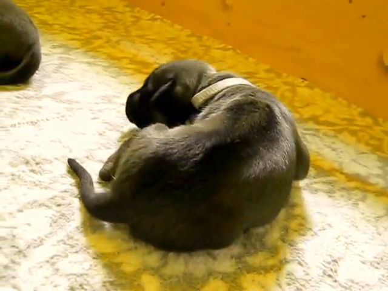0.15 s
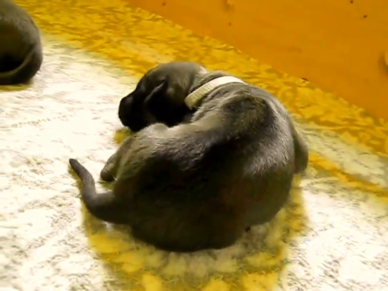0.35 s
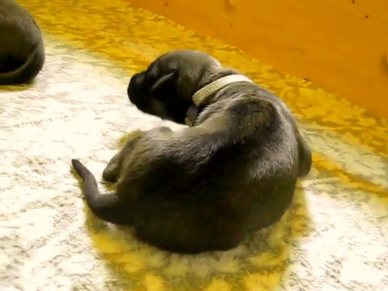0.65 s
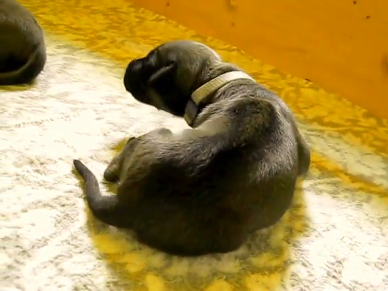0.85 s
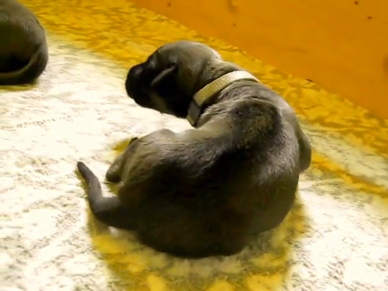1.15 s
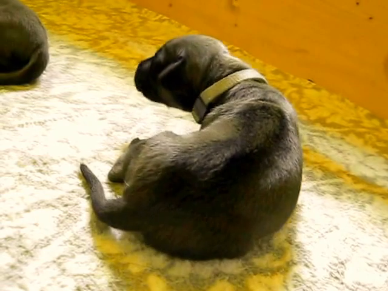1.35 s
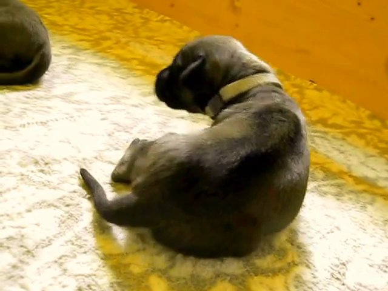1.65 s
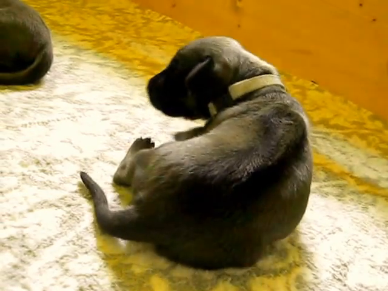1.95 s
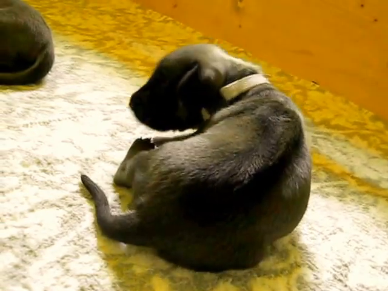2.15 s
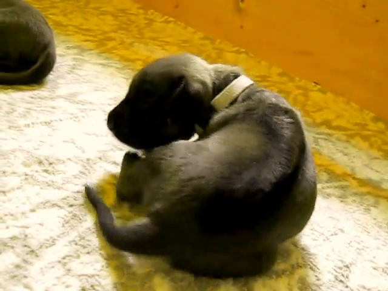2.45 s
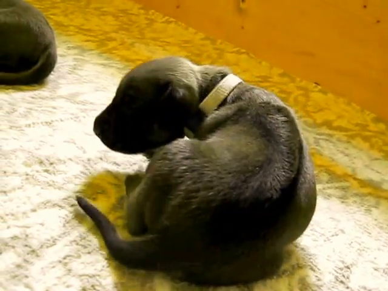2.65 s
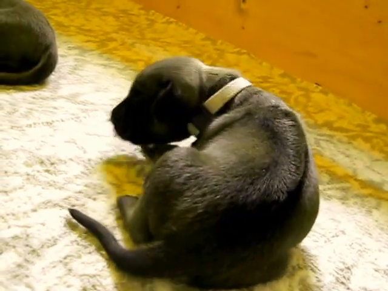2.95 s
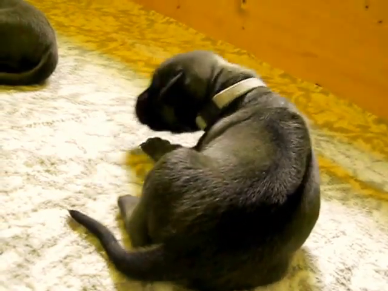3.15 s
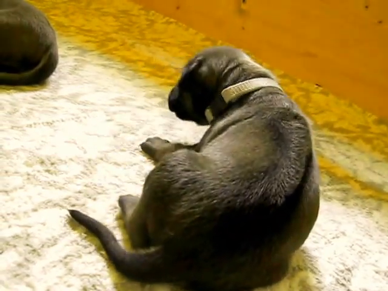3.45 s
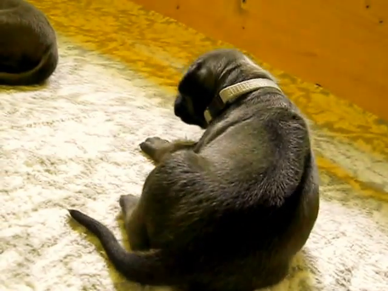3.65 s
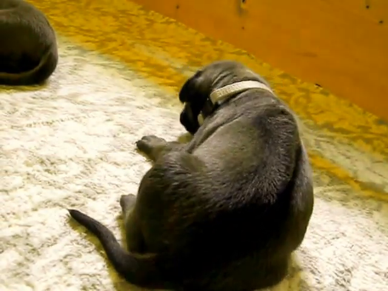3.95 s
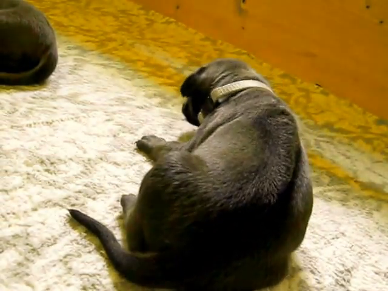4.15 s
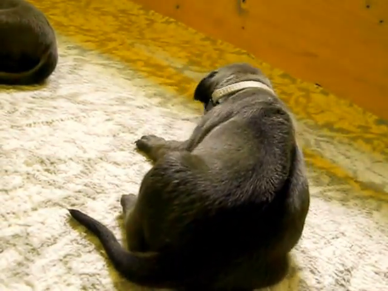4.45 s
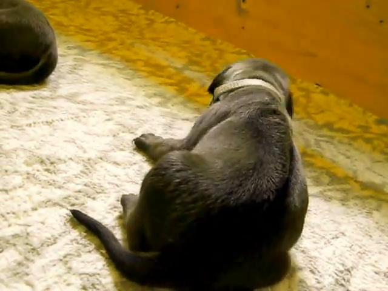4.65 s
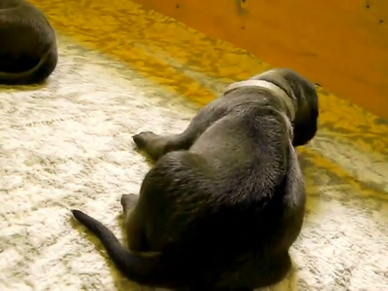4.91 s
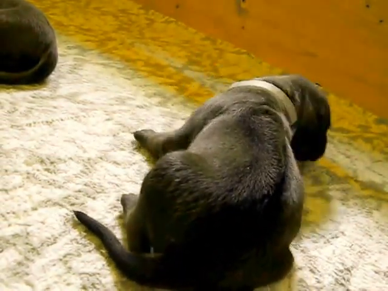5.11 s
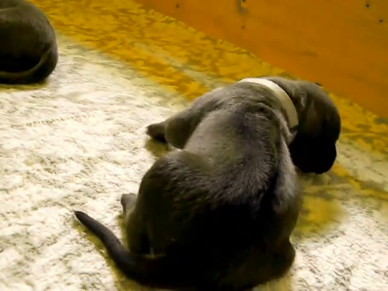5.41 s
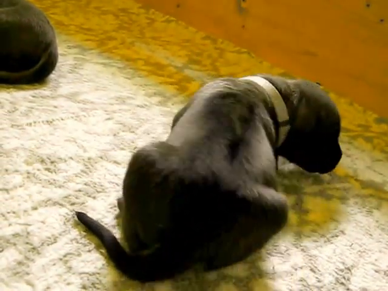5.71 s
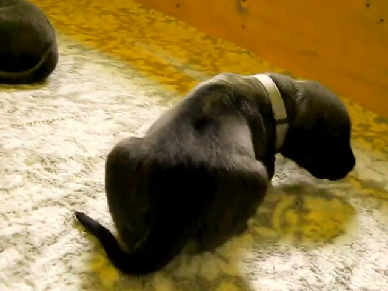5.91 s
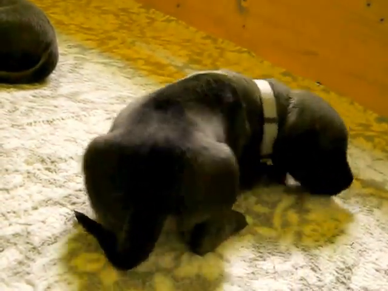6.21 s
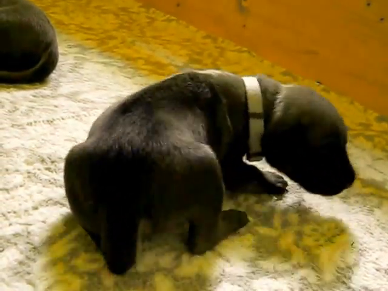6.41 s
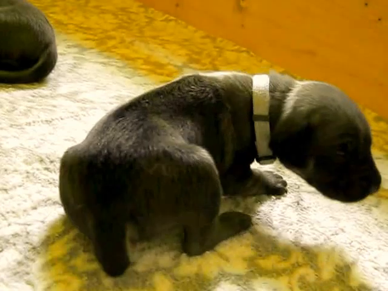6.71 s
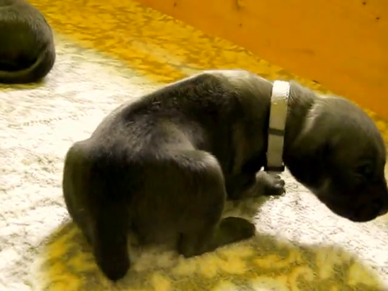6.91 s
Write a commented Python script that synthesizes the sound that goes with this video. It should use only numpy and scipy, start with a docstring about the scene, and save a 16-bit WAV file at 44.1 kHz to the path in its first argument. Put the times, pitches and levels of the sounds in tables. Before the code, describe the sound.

Brief puppy whines and piercing little squeaks come in separate bursts, with faint clicks and paw scuffs in a small boxy indoor space.

```python
"""A young puppy whimpers on a blanket in a wooden whelping box, close to the microphone. Low nasal whines and
high whistling squeaks are summed from vocal-fold partials through throat and nose; each cry bends in pitch and
creaks, in bursts of uneven fold slaps, as it starts and stops. Faint hums are wavering sines, mouth clicks and
paw scuffs are shaped noise; the room answers over a soft hiss."""
import sys
import numpy as np
from scipy import signal
from scipy.fft import rfft, irfft, next_fast_len
from scipy.io import wavfile
from scipy.ndimage import uniform_filter1d, map_coordinates

SR = 44100
rng = np.random.default_rng(int(sys.argv[2]) if len(sys.argv) > 2 else 0)


def generate_wav(signal):
    """Clip the signal to [-1, 1] and save it as 16-bit WAV at the path in sys.argv[1]."""
    frames = np.transpose(np.atleast_2d(signal))
    scaled = np.clip(frames, -1, 1) * 32767
    pcm = np.round(scaled).astype(np.int16)
    wavfile.write(sys.argv[1], SR, pcm)


N = 311787
T = np.arange(N) / SR

# Hiss spectrum. Each row: frequency in Hz, relative density in dB per Hz.
HISS_SPECTRUM = [(12, -49), (20, -11), (276, -3.5), (345, -4.5), (419, -5.5), (524, -6), (775, -6),
                 (1110, -7), (1470, -8.5), (1890, -9.5), (6470, -17), (7860, -20), (9560, -17.5),
                 (15800, -25)]
# Room decay. Each row: frequency in Hz, t60 in seconds.
ROOM_T60 = [(300, 0.33), (1000, 0.4), (2000, 0.18), (6000, 0.39), (14000, 0.42)]
# Blanket friction spectrum. Each row: frequency in Hz, relative level in dB.
BLANKET_SPECTRUM = [(200, -4), (600, 19), (1500, 14), (3000, 9), (4000, 10.5), (6000, -3), (15000, -13)]
# Paws scuff the blanket. Each row: centre in seconds, length in seconds, level in dB.
SCUFFS = [(0.11, 0.018, -56), (2.483, 0.044, -50), (3.129, 0.047, -52), (3.185, 0.052, -54),
          (3.25, 0.061, -56), (5.973, 0.032, -55), (6.549, 0.053, -57)]
# Mouth clicks and claw ticks. Each row: start in seconds, level in dB, then the dull and the bright part
# relative to it in dB, before the common CLICK_PARTS_DB.
CLICKS = [(0.107, -34, -8, -14), (3.035, -15.5, -16, -24), (3.0471, -37, -30.5, -9),
          (3.6184, -29, -13.5, -15), (5.0442, -36.5, -3.5, -26), (5.394, -27, -42, -13),
          (5.425, -38, -18, -9), (5.436, -39.5, -2, -22), (5.4977, -40, -22, -5),
          (5.536, -19.5, -17.5, -18.5), (5.6195, -37.5, -5, -18), (6.5331, -40.5, -5, -2),
          (6.559, -32, -29, -10)]
# Spectra of the two click parts. Each row: frequency in Hz, relative level in dB.
DULL_CLICK = [(200, 4), (900, 13.5), (2400, 2), (3600, 7.5), (8000, -34)]
BRIGHT_CLICK = [(3000, -20), (7000, -8.5), (15000, -13.5), (18000, -32)]
# Closed-mouth hums. Each row: start in seconds, length in seconds, pitch in Hz, fundamental level in dB,
# level step per overtone in dB.
HUMS = [(.39, .15, 345, -56, -16), (1.02, .075, 305, -57, -0.5), (.112, .03, 335, -48, -14)]
# Throat response. Each row: frequency in Hz, gain in dB.
THROAT = [(330, -7.5), (450, -12), (600, -6.5), (750, -4.5), (900, 1), (1120, 0), (1280, 0), (1420, -7),
          (1700, -5), (1900, -10), (2300, -22), (3000, -37), (4500, -47.5), (6000, -77)]
# Nasal ring. Each row: frequency in Hz, relative level in a whine in dB, in a whistle in dB.
NOSE = [(3040,-11,-42),(4760,-17,-24),(5380,7,3),(5730,9,-3.5),(6630,2.5,-10),(7500,-14.5,-26.5),(9340,-1,-8.5),(10300,3.5,2.5),(10870,-5,-16),(11400,5.5,-19),(13200,-9,-19),(14000,-9,-22),(15500,-0.5,-27)]
WHINE_NOSE, WHISTLE_NOSE = np.array(NOSE)[:, :2], np.array(NOSE)[:, ::2]
# The folds beat unevenly for a while. Each row: time in seconds, depth of period doubling 0-1.
DOUBLING = [(2.845, 0), (2.865, .45), (2.92, .3), (2.96, 0)]
# High squeaks. Each row: start, voice break, crest and end in seconds; start (before the leap lowers it),
# crest and end pitch in Hz; pitch leap at the break 0-1; level, level at the end re break, overtones,
# nasal ring and top of the ring in dB; roughness 0-1; opening and closing creak in dB.
SQUEAKS = [ (1.524, 1.553, 1.592, 1.655, 875, 1286, 1095, 0.06, -20.5, 0, -7.5, -51.5, -3, 0, -38, -45),
           (1.932, 1.957, 2.006, 2.085, 805.5, 1070, 755, 0.13, -25, 0.5, -5, -48, -5.5, 0.19, -31.5, -35),
           (5.486, 5.513, 5.536, 5.586, 959, 1117, 1169, 0.03, -25, -6, -2, -56, 3, 0.02, -36, -37.5),
           (5.846, 5.877, 5.907, 5.996, 984, 1275, 950, .05, -23, -5, -1, -48.5, 4, 0, -35, -35), ]
# Low whines. Each row: start, crest and end in seconds; start, crest and end pitch in Hz; sag on the way
# to the crest 0-1; level, start re crest, end re crest, fundamental, nasal ring and top of the ring in dB;
# roughness 0-1; opening and closing creak in dB.
WHINES = [ (1.099, 1.173, 1.192, 359.3, 463, 391, 0.1, -33, -11, -36, 1, -52.5, -5, 0.21, -54, -35),
          (2.331, 2.444, 2.466, 459.6, 666, 565, .03, -23, -9, -4.5, 0.5, -43, -7.5, 0.06, -44, -29.5),
          (2.753, 2.833, 2.982, 538.5, 564.3, 524.4, 0.2, -29, -5.5, 2, -1.5, -52.5, -4.5, 0.18, -40.5, -39),
          (3.28, 3.368, 3.393, 446, 460.4, 439, 0.13, -28, -14.5, -4.5, -1, -54.5, -2, 0.08, -40.5, -44),
          (3.684, 3.75, 3.759, 425.6, 367.4, 387, 0.08, -32.5, -11, -4, -2.5, -62, 6, 0.2, -43, -51),
          (4.118, 4.172, 4.183, 425.7, 379.3, 347, 0.07, -36.5, -8.5, -7, -2, -77, 1, 0.38, -43.5, -49),
          (4.661, 4.723, 4.730, 457, 469, 468, 0.05, -28, -3, -14, -5, -50.5, 1.5, 0.1, -47, -40),
          (5.088, 5.154, 5.159, 476.5, 575, 586, .05, -35.5, -6.5, -3.5, -2, -58, 5, 0.29, -38.5, -55),
          (6.213, 6.304, 6.438, 566.3, 587.6, 471.5, .105, -23.5, -16, -7.5, 1, -45, -1, 0.06, -35.5, -38.5),
          (6.682, 6.768, 6.788, 499.4, 399.7, 364, 0.2, -33.5, -5.5, -6, 7, -50, 0, 0.31, -34, -30.5),
          (7.05, 7.062, 7.090, 575, 550, 540, 0.04, -43.5, -16, 8, 15.5, -59, 14, 0.54, -39, -55), ]

HISS_DB = -55.8
CLICK_PARTS_DB = -5
TOP_HZ = 15800  # band limit
PARTIALS = np.arange(1, 41)[:, None]
SAG_AT, FALL_CURVE = 0.44, 0.82  # share of the rise where pitch sags most; shape of the fall, 1 = straight
PITCH_LAG_S = 0.02  # the folds cannot change pitch faster
SETTLE, LOOSE_ROUGH = 0.16, 0.5  # share of a cry before the folds find their beat; roughness until then
BREAK_S, BREAK_DB = 0.014, -16  # the fundamental falters at the flip
# before the flip: fundamental, overtones; and level at the start
PRESSED_DB, PRESSED_OVERTONES_DB, SQUEAK_SWELL_DB = -2.5, 2.5, -9
SWELL_CURVE = 1.69  # a whine swells fast at first, then eases into its crest
NOSE_FOLLOWS = 0.69  # share of the swell and fade that the nasal ring takes
CLOSING_S, CLOSING_DB = 0.0093, 13.5  # the closing mouth favours the fundamental
MUFFLE_ABOVE_HZ, MUFFLE_DB_PER_OCTAVE = 540, -40  # and, once shut, muffles the overtones
UPPER_DB, UPPER_ROUGH_DB = -14, 26  # past the third partial: clean whine; gain at full roughness
OPEN_CREAK_S, OPEN_CREAK_RATIO = 0.014, 1.366  # length; mouth resonance over the starting pitch
# shortest length; mouth resonance over the final pitch; ceiling of that resonance
CLOSE_CREAK_S, CLOSE_CREAK_RATIO, CLOSE_CREAK_MAX_HZ = 0.006, 1.677, 980
HOARSE_CREAK_S, CREAK_OVERHANG_S = 0.053, 0.004214  # extra length at full roughness; time past the voice


def amp(db):
    """Decibels to gain."""
    return 10 ** (np.asarray(db) / 20)


def unit(x):
    """Scale to rms 1."""
    return x / np.sqrt(np.mean(np.abs(x) ** 2) + 1e-20)


def along(points, hz):
    """(Hz, value) points read on a log axis."""
    f, v = np.transpose(points)
    return np.interp(np.log(hz + 1), np.log(f + 1), v)


def octaves_above(hz, corner_hz):
    """Octaves of hz over a corner; 0 below it."""
    return np.maximum(np.log2(hz / corner_hz), 0)


def wobble(t, rate_hz):
    """A smooth random curve, rate_hz knots a second."""
    knots = (t - t[0]) * rate_hz
    return map_coordinates(rng.standard_normal(4096), [knots + 2], mode="wrap")


def gate(t, start, end, edge):
    """1 between start and end, with soft edges."""
    return (1 + np.tanh((t - start) / edge)) * (1 + np.tanh((end - t) / edge)) / 4


def filtered(x, response):
    """x times a response of frequency."""
    m = next_fast_len(N + SR // 2)
    return irfft(rfft(x, m) * response(np.fft.rfftfreq(m, 1 / SR)), m)[:N]


def noise(spectrum):
    """Coloured noise of rms 1."""
    return unit(filtered(rng.standard_normal(N), lambda hz: amp(along(spectrum, hz))))


def hiss():
    """Steady coloured noise."""
    return amp(HISS_DB) * noise(HISS_SPECTRUM)


def room(x, early_db=-14, tail_db=-11.0, early_t60_s=0.33):
    """The room answers 5 ms later as decaying noise: an even early layer and a tail whose decay varies with
    frequency."""
    hz, t, z = signal.stft(rng.standard_normal((2, SR // 2)), SR, nperseg=256)
    early = signal.istft(z[0] * amp(-60 * t / early_t60_s), SR, nperseg=256)[1]
    tail = signal.istft(z[1] * amp(-60 * t / along(ROOM_T60, hz)[:, None]), SR, nperseg=256)[1]
    answer = amp(early_db) * early / np.linalg.norm(early)
    answer += amp(tail_db) * tail / np.linalg.norm(tail)
    return signal.fftconvolve(x, np.pad(answer, (SR // 200, 0)))[:N]


def scuffs(grain_db=3):
    """Paws drag over the pile in short strokes of grainy noise."""
    strokes = np.zeros(N)
    for centre, length, db in SCUFFS:
        strokes += amp(db) * gate(T, centre - length / 2, centre + length / 2, edge=0.0013)
    return strokes * unit(noise(BLANKET_SPECTRUM) * amp(grain_db * wobble(T, 210)))


def clicks(t60_s=0.037):
    """Each tick is a short decaying noise burst with a dull and a bright part."""
    dull, bright = np.zeros(N), np.zeros(N)
    fade = amp(-60 * T[:SR // 10] / t60_s)
    for start, db, dull_db, bright_db in CLICKS:
        first = round(start * SR)
        dull[first:][:len(fade)] += amp(db + dull_db + CLICK_PARTS_DB) * fade
        bright[first:][:len(fade)] += amp(db + bright_db + CLICK_PARTS_DB) * fade
    return dull * noise(DULL_CLICK) + bright * noise(BRIGHT_CLICK)


def hums():
    """Weak closed-mouth moans: four sine partials that waver together in pitch."""
    out = np.zeros(N)
    for start, length, hz, db, step_db in HUMS:
        span = np.abs(T - start - length / 2) < length
        t = T[span]
        phase = 2 * np.pi * np.cumsum(hz * (1 + 0.03 * wobble(t, 250))) / SR
        tone = sum(amp(db + step_db * k) * np.sin((k + 1) * phase) for k in range(4))
        out[span] += gate(t, start, start + length, edge=0.0012) * tone
    return out


def creak_times():
    """Creaks as the folds open and, longer if hoarse, close: centre s, length s, level dB, resonance Hz."""
    cries = [(start, *rest) for start, _, *rest in WHINES]
    cries += [(start, *rest) for start, _, _, *rest in SQUEAKS]
    for start, end, hz, _, end_hz, *_, hoarse, open_db, close_db in cries:
        yield start, OPEN_CREAK_S, open_db, OPEN_CREAK_RATIO * hz
        length = CLOSE_CREAK_S + HOARSE_CREAK_S * abs(hoarse)
        if end < T[-1]:
            close_hz = min(CLOSE_CREAK_RATIO * end_hz, CLOSE_CREAK_MAX_HZ)
            yield end + CREAK_OVERHANG_S - length / 2, length, close_db, close_hz


def creaks(rate_hz=430, upper_db=-6, upper_ratio=1.567, t60_s=0.029, nose_db=-19):
    """A few uneven slaps of the folds ring two mouth resonances and hiss in the nose."""
    out, ring_t = np.zeros(N), T[:SR // 40]
    nasal = noise(WHINE_NOSE)
    for centre, length, db, hz in creak_times():
        span = np.abs(T - centre) < length
        t = T[span]
        cycles = np.cumsum(rate_hz * amp(3 * wobble(t, 500))) / SR
        slaps = np.diff(np.floor(cycles), prepend=-1)  # an impulse at each whole cycle
        lower = np.sin(2 * np.pi * hz * ring_t)
        upper = amp(upper_db) * np.sin(2 * np.pi * upper_ratio * hz * ring_t)
        mouth = amp(-60 * ring_t / t60_s) * (lower - upper)
        burst = unit(np.convolve(slaps, mouth)[:len(slaps)]) + amp(nose_db) * nasal[span]
        out[span] += amp(db) * burst * gate(t, centre - length / 2, centre + length / 2, edge=0.00061)
    return out


def arch(t, start, crest, end, start_hz, crest_hz, end_hz, sag):
    """Pitch in Hz glides from start to crest, sagging on the way, then to its end; smoothed by the folds."""
    rise = np.clip((t - start) / (crest - start), 0, 1)
    fall = np.clip((t - crest) / (end - crest), 0, 1) ** FALL_CURVE
    pitch = start_hz + (crest_hz - start_hz) * rise + (end_hz - crest_hz) * fall
    pitch *= 1 - sag * np.interp(rise, [0, SAG_AT, 1], [0, 1, 0])
    return uniform_filter1d(pitch, size=round(PITCH_LAG_S * SR))


def cry(t, start, end, pitch, level_db, ring_db, hoarse, nose_shape, top_db,
        waver_db=1.5, breath=0.42, patchy_db=3):
    """Partials of the vocal folds through throat and nose; roughness shifts to its loose value at both ends."""
    loose = 1 - gate(t, start + SETTLE * (end - start), end - 0.006, 0.005)
    rough = hoarse + (LOOSE_ROUGH - hoarse) * loose
    jitter = 0.005 * wobble(t, 110) + 0.06 * rough * wobble(t, 600)
    phase = 2 * np.pi * np.cumsum(pitch * (1 + jitter)) / SR
    hz = PARTIALS * pitch

    # the partials waver in level, each on its own
    waver = waver_db * np.array([wobble(t, 55.6) for _ in PARTIALS])
    throat = amp(level_db + along(THROAT, hz) + waver)
    patches = patchy_db * np.array([wobble(t, 43.5) for _ in PARTIALS])
    nose = amp(along(nose_shape, hz) + top_db * (hz > 8000) + patches) * (hz < TOP_HZ)
    nose *= amp(ring_db) / np.linalg.norm(nose, axis=0)

    # each partial scatters in size and phase as the folds lose their beat
    scatter = np.array([wobble(t, 480) + 1j * wobble(t, 480) for _ in PARTIALS]) / np.sqrt(2)

    def smear(share):
        """Mix of steady and scattered partial."""
        return np.sqrt(1 - share ** 2) + share * scatter

    partials = throat * smear(rough) + nose * smear(np.clip(breath + rough, 0.45, 0.95))
    wave = np.sqrt(2) * np.sum(partials * np.exp(1j * PARTIALS * phase), axis=0).imag
    # alternate strong and weak cycles put lines halfway between the partials
    alternate = 1 + np.interp(t, *np.transpose(DOUBLING)) * np.cos(phase / 2)
    return wave * alternate * gate(t, start, end, edge=0.0025)


def squeaks():
    """High cries start pressed and flat, falter, then leap into a loud, nearly pure whistle."""
    out = np.zeros(N)
    for (start, flip, crest, end, start_hz, crest_hz, end_hz, leap, db, fade_db,
         overtone_db, ring_db, top_db, hoarse, _, _) in SQUEAKS:
        span = (T > start - 0.02) & (T < end + 0.02)
        t = T[span]
        flip_start, flip_end = flip - BREAK_S / 2, flip + BREAK_S / 2
        pressed = np.interp(t, [flip_start, flip_end], [1, 0])
        pitch = arch(t, start, crest, end, start_hz, crest_hz, end_hz, 0) * (1 - leap * pressed)
        fundamental = PRESSED_DB * pressed + BREAK_DB * gate(t, flip_start, flip_end, edge=0.0017)
        overtones = overtone_db + PRESSED_OVERTONES_DB * pressed
        level = db + np.interp(t, [start, flip, end], [SQUEAK_SWELL_DB, 0, fade_db])
        level = level + np.where(PARTIALS == 1, fundamental, overtones)
        out[span] += cry(t, start, end, pitch, level, ring_db, hoarse, WHISTLE_NOSE, top_db)
    return out


def whines():
    """Low nasal cries swell to their crest and end as the mouth closes; hoarse ones are brighter."""
    out = np.zeros(N)
    for (start, crest, end, start_hz, crest_hz, end_hz, sag, db, swell_db, fade_db,
         fundamental_db, ring_db, top_db, hoarse, _, _) in WHINES:
        span = (T > start - 0.02) & (T < end + 0.02)
        t = T[span]
        pitch = arch(t, start, crest, end, start_hz, crest_hz, end_hz, sag)
        effort = swell_db * np.interp(t, [start, crest], [1, 0]) ** SWELL_CURVE
        effort += np.interp(t, [crest, end], [0, fade_db])
        closing = np.clip(1 - (end - t) / CLOSING_S, 0, 1)
        muffle = MUFFLE_DB_PER_OCTAVE * closing * octaves_above(PARTIALS * pitch, MUFFLE_ABOVE_HZ)
        colour = np.where(PARTIALS == 1, fundamental_db + CLOSING_DB * closing, muffle)
        colour += (UPPER_DB + UPPER_ROUGH_DB * hoarse) * (PARTIALS > 3)
        out[span] += cry(t, start, end, pitch, db + effort + colour,
                         ring_db + NOSE_FOLLOWS * effort, hoarse, WHINE_NOSE, top_db)
    return out


def scene(lowest_hz=310):
    """The puppy in its box over the hiss; so small a muzzle radiates no bass."""
    voice = filtered(whines() + squeaks() + creaks(), lambda hz: 1 - 1 / (1 + (hz / lowest_hz) ** 8))
    puppy = voice + hums() + clicks() + scuffs()
    return (puppy + room(puppy) + hiss())[None]


def record(dry, notch_hz=7900, notch_width_hz=750):
    """A deep notch in the treble and a band limit."""
    def response(hz):
        """Gain at hz."""
        notch = np.abs(hz - notch_hz) / np.hypot(hz - notch_hz, notch_width_hz)
        return notch * (hz < TOP_HZ)

    return filtered(dry[0], response)[None]


dry = scene()
out = record(dry)
generate_wav(out)
```